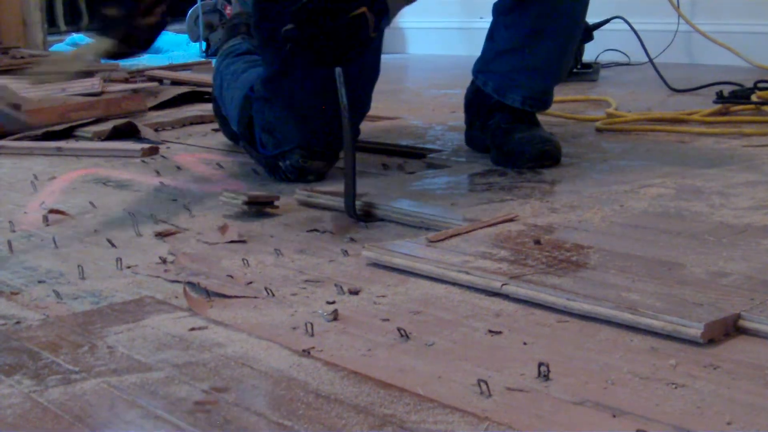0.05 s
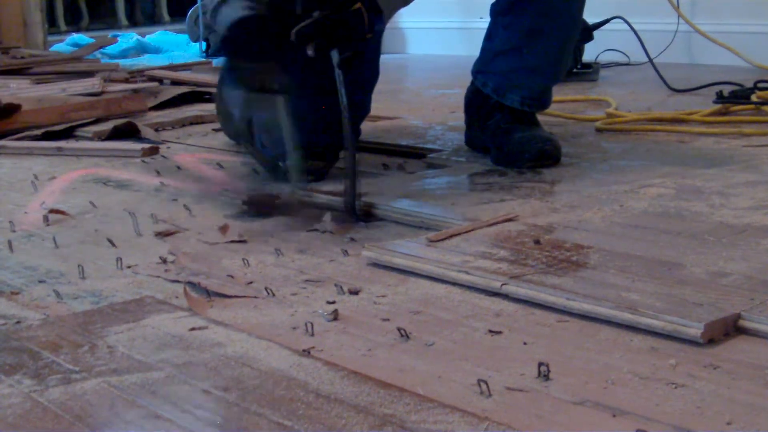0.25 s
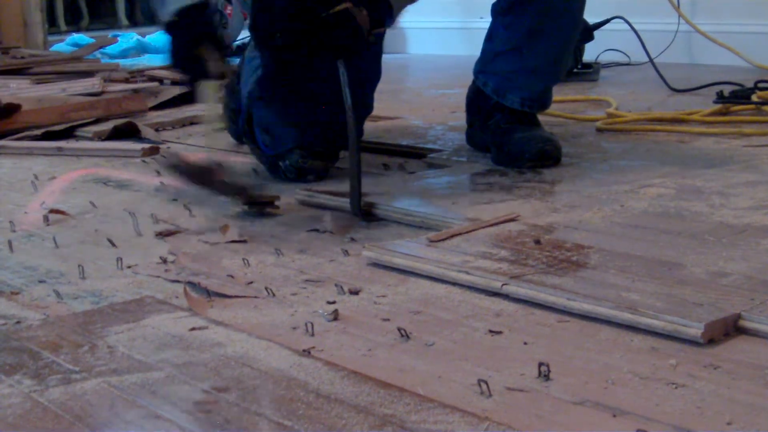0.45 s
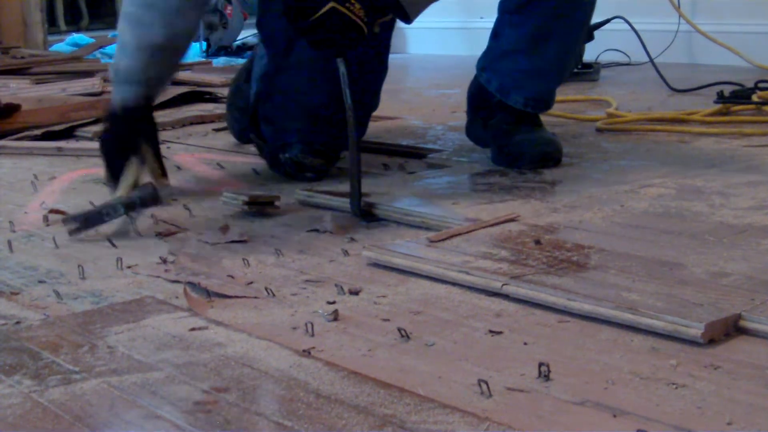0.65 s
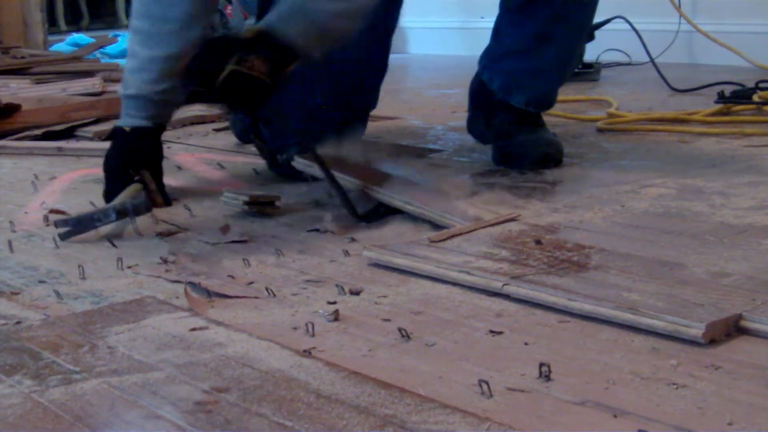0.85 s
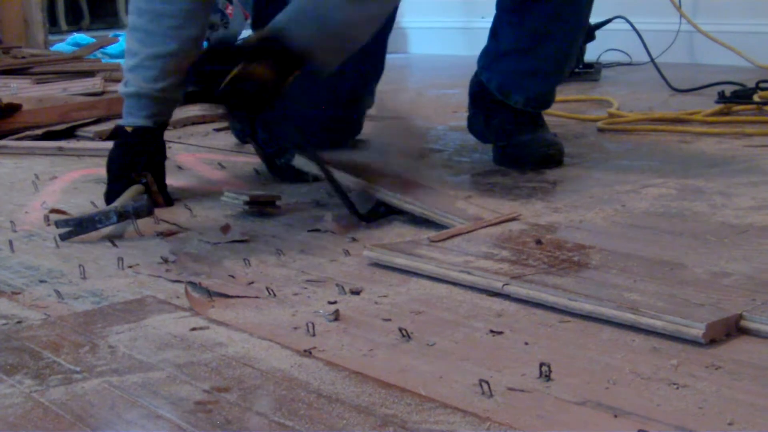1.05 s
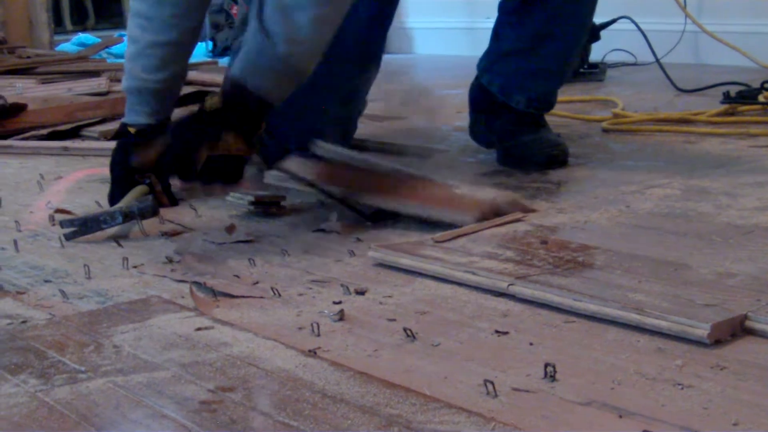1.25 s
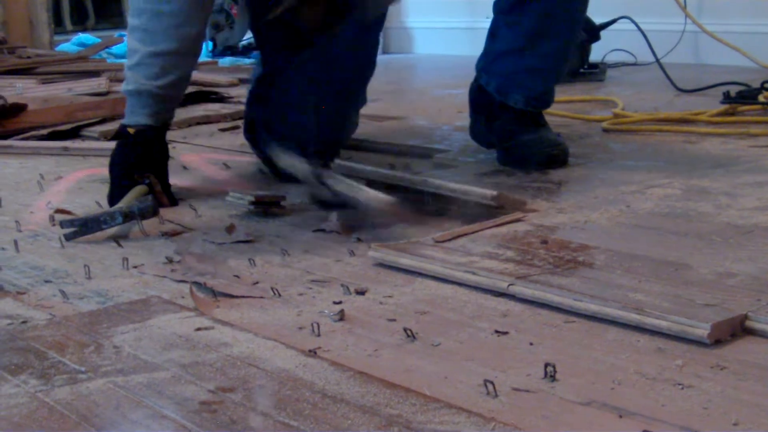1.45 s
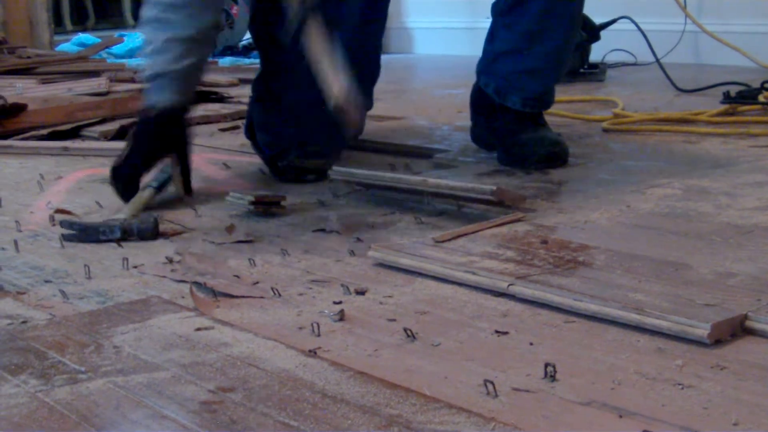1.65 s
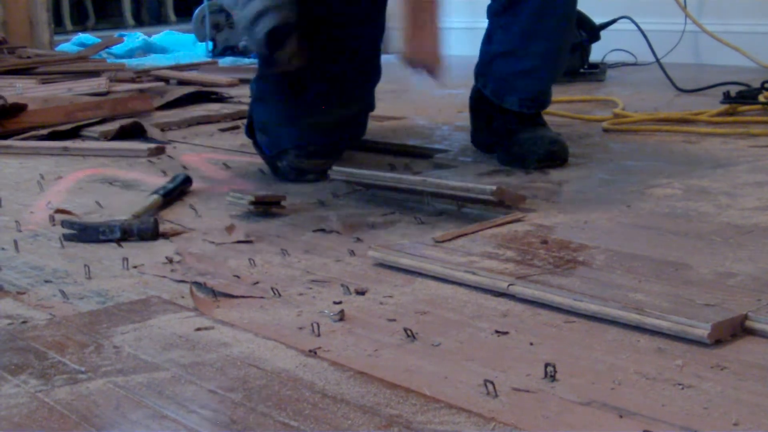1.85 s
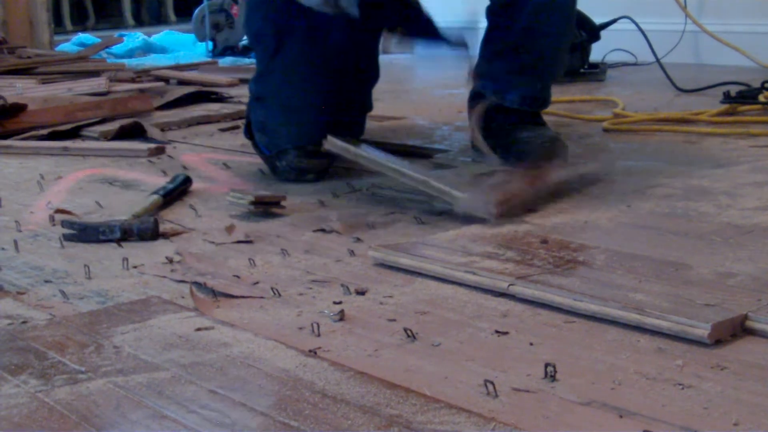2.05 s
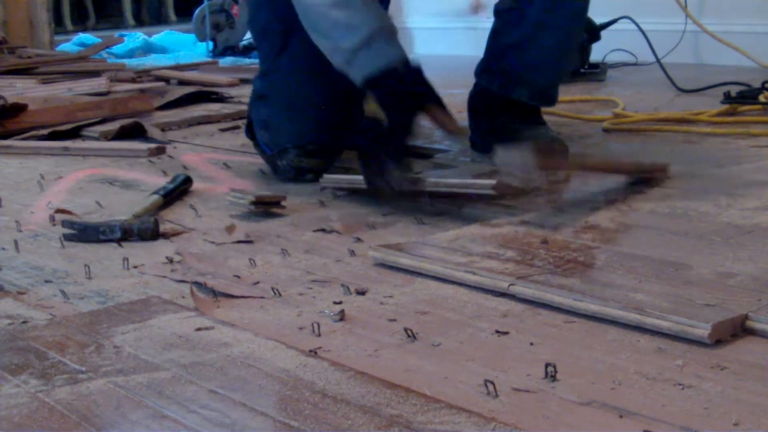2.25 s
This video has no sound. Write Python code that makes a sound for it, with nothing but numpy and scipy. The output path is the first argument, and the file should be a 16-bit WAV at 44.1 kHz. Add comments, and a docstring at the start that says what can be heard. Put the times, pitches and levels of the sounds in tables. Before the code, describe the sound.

In an empty, reverberant room, an earlier blow's echo fades, a hammer hits a pry bar hard, is set down with small knocks, a hardwood strip snaps free, soft thuds follow, and a broken piece lands.

```python
"""The echo of a hammer blow dies away in a bare room, then the hammer drives a steel bar under a floor strip.
The hammer is dragged and laid down, the strip cracks loose from its nails and a knee and boot shift.
A chip lands, then a broken piece of wood touches down on the subfloor and falls flat, over a faint hush.
Contacts are chattering clicks that may ring a few modes; drag, scuff and splinters are random clicks.
Each source is filtered to its colour and heard through wall echoes and a tail of decaying noise."""
import sys
import numpy as np
from scipy import signal
from scipy.fft import rfft, irfft, next_fast_len
from scipy.io import wavfile

SR = 44100
rng = np.random.default_rng(int(sys.argv[2]) if len(sys.argv) > 2 else 0)


def to_wav(s):
    """Save 16-bit WAV."""
    ch = np.atleast_2d(s).T  # columns
    pcm = np.round(np.clip(ch, -1, 1) * 32767)  # PCM
    wavfile.write(sys.argv[1], SR, pcm.astype(np.int16))


def voltage_ratio(level):
    """Linear amplitude factor for a level in decibels (scalar or array-like)."""
    return 10 ** (np.asarray(level, float) / 20)


N = 101429
LEAD = SR // 2   # pre-roll samples, for the blow before the start
SIZE = next_fast_len(N + 2 * SR)   # transform length, with space for the tails
MIC_TOP_HZ = 15300

# Hammer contacts on the steel bar: start_s, level_db, cutoff_hz, snap_above_cutoff_db
BLOWS = [(-0.16, -3, 5165, -15), (0.2085, -39, 4963, 11), (0.2106, 3.5, 5000, 1.5)]
# Ringing modes of the steel bar: pitch_hz, level_db, t60_s
BAR_MODES = [(1303, -58.5, .02), (1520, -44, .02), (2245, -46.5, 0.012), (2500, -46.5, 0.055),
             (6057, -39.5, .02), (7800, -42, 0.077), (10100, -41, 0.013), (11450, -42.5, .03)]
# Relative spectrum of the blows: frequency_hz, level_db
BLOW_COLOUR = [(35, -80), (60, -49.5), (135, -42), (209, -20), (302, -11.5), (381, -22), (458, -10),
               (539, -17), (663, -6.5), (798, -18.5), (982, -7), (1270, -1), (1880, -6), (2530, -3),
               (2910, -7), (3930, -10.5), (4310, -13.5), (6090, -7.5), (7160, -13.5), (9670, -8),
               (15000, -17)]


def hammer_on_bar():
    """Hard contacts set the short, bright modes of the steel ringing."""
    return in_room(struck(BLOWS, BAR_MODES), BLOW_COLOUR, direct_db=1.5, echo_db=-3.2)


# Pressure of the hammer's scrape on the floor: time_s, level_db
DRAG_PRESSURE = [(0.67, -70), (0.69, -54.5), (0.735, -51), (0.742, -39.5), (0.78, -41.5), (0.798, -39.5),
                 (0.818, -49.5), (0.86, -66.5)]
# Hammer knocks on the boards: start_s, level_db, cutoff_hz, snap_above_cutoff_db
KNOCKS = [(0.7105, -42, 2476, -3), (0.7175, -44, 2500, -14), (0.740, -33.5, 3000, -16),
          (0.753, -40, 5000, -1), (0.770, -41, 4000, -14), (0.778, -29.5, 2960, -13),
          (0.784, -31, 1800, -1), (0.795, -38, 1500, -19), (0.803, -48, 2980, 5)]
# Relative spectrum of drag and knocks: frequency_hz, level_db
DRAG_COLOUR = [(29, -48), (50, -2), (170, -13.5), (296, -8), (367, -14), (404, -12.5), (654, -7.5),
               (720, -3), (873, -4.5), (1160, -1), (1630, -6), (2070, -4), (3600, -13), (10900, -20),
               (15600, -24.5)]


def hammer_laid_down():
    """Friction makes a dense grit of clicks while the hammer knocks on the boards."""
    drag = rubbing(DRAG_PRESSURE, per_s=2100, spread_db=-1)
    return in_room(drag + struck(KNOCKS), DRAG_COLOUR, direct_db=4.5, echo_db=-3.5)


# Cracks as the strip comes loose: start_s, level_db, cutoff_hz, snap_above_cutoff_db
CRACKS = [(1.050, -49, 3073, -2), (1.0557, -23, 3250, 0), (1.0635, -17, 3000, -8),
          (1.0668, -11.5, 3130, -2.5), (1.079, -25, 4640, 15)]
# Ringing modes of the strip: pitch_hz, level_db, t60_s
STRIP_MODES = [(1396, -38, 0.045), (1840, -32.5, 0.0092), (2666, -36.5, 0.017)]
# Relative spectrum of cracks and splinters: frequency_hz, level_db
CRACK_COLOUR = [(29, -71), (50, -21), (124, -21.5), (177, -16.5), (230, -16), (531, -17), (674, -7),
                (856, -9), (1310, -2), (2020, -5.5), (2570, -6), (3500, -14), (3760, -16), (5640, -15.5),
                (7870, -21.5), (11300, -19.5), (15000, -31.5)]


def strip_cracks():
    """Sudden cracks ring the strip and start a dying shower of splinter clicks."""
    start_s, t60_s, start_db = 1.068, 0.36, -29
    t = np.arange(-LEAD, N) / SR - start_s
    level_db = np.where(t > 0, start_db - 60 * t / t60_s, -200)
    clicks = grains(level_db, per_s=1500, spread_db=1.4)
    splinters = np.diff(clicks, prepend=0)   # differencing tilts them to the treble
    return in_room(struck(CRACKS, STRIP_MODES) + splinters, CRACK_COLOUR, direct_db=4.5, echo_db=-22)


# Contacts of the small chip: start_s, level_db, cutoff_hz, snap_above_cutoff_db
CHIP_CONTACTS = [(1.940, -51, 4070, -11), (1.9425, -40, 2770, -18), (1.945, -38.5, 4000, 5.5),
                 (1.949, -39, 3000, -14.5), (1.976, -42.5, 2800, -26)]
# Ringing mode of the chip: pitch_hz, level_db, t60_s
CHIP_MODES = [(5800, -18.5, 0.0067)]
# Relative spectrum of the chip: frequency_hz, level_db
CHIP_COLOUR = [(47, -63), (80, -47), (219, -4), (404, -13), (482, -6), (715, -7), (1060, -15), (1540, -2),
               (2000, -17), (2600, -5), (2900, -25.5), (5480, -23), (15000, -30)]


def chip_lands():
    """A light chip makes small contacts with one very short, high ring."""
    return in_room(struck(CHIP_CONTACTS, CHIP_MODES), CHIP_COLOUR, direct_db=6, echo_db=-17)


# The wood touches down: start_s, level_db, cutoff_hz, snap_above_cutoff_db
DROPS = [(2.0125, -17.5, 5070, 4), (2.024, -38, 6100, 17)]
# Ringing modes of the piece of wood: pitch_hz, level_db, t60_s
PIECE_MODES = [(1420, -40.5, 0.046), (2142, -41, .045), (2194, -39, 0.035), (2560, -38, 0.023),
               (3220, -43, 0.025), (4400, -39.5, 0.021)]
# Relative spectrum of the touchdown: frequency_hz, level_db
DROP_COLOUR = [(29, -49), (50, -20), (98, -36), (177, -17.5), (272, -15), (354, -22), (389, -20),
               (941, -13.5), (1380, -9.5), (1710, -12.5), (2170, -6), (3180, -16), (3420, -23.5),
               (4340, -26), (7870, -44.5), (11000, -39), (15000, -49)]


def piece_touches_down():
    """The impact sets the modes of the wood ringing briefly."""
    return in_room(struck(DROPS, PIECE_MODES), DROP_COLOUR, direct_db=0, echo_db=-5)


# The wood falls flat: start_s, level_db, cutoff_hz, snap_above_cutoff_db
FLOPS = [(2.258, -28, 704, -22), (2.261, -26.5, 2530, -8), (2.274, -29.5, 2800, -2), (2.29, -52, 5000, 12)]
# Relative spectrum of the fall: frequency_hz, level_db
FLOP_COLOUR = [(47, -56), (80, -38), (244, -8.5), (404, -14), (731, -7.5), (1570, -4.5), (2040, -12.5),
               (2280, 0), (3380, -35.5), (11300, -40.5), (15000, -48)]


def piece_falls_flat():
    """Flat contacts slap the subfloor without a ring of their own."""
    return in_room(struck(FLOPS), FLOP_COLOUR, direct_db=2.5, echo_db=-5)


# Bumps under the blow and as knee and boot shift: start_s, level_db, cutoff_hz, snap_above_cutoff_db
THUDS = [(0.211, -30, 70, -50.5), (0.58, -41, 292, -40), (0.705, -34.5, 209, -36.5), (0.80, -31, 86.3, -44),
         (1.541, -37.5, 396, -43), (1.573, -39.5, 400, -42), (1.590, -43.5, 2170, -27),
         (1.606, -41, 1207, -28), (1.613, -49, 1100, -27), (1.645, -48, 1210, -21.5),
         (1.685, -52, 3000, -23), (1.74, -49, 397, -31), (1.812, -60, 4500, -18.5)]
# Pressure of a boot scuffing the dust: time_s, level_db
SCUFF_PRESSURE = [(1.575, -79), (1.595, -67.5), (1.63, -75), (1.67, -82)]
# Relative spectrum of bumps and scuff: frequency_hz, level_db
THUD_COLOUR = [(24, -32.5), (45, -20), (167, -23), (252, -3.5), (418, -15.5), (865, -11.5), (1300, -15),
               (2000, -25), (2600, -24.5), (3400, -29), (5000, -42.5), (10500, -27), (13000, -38),
               (15500, -55)]


def subfloor_thuds():
    """Dull bumps come through the subfloor; a boot on dust adds fine friction grit."""
    scuff = rubbing(SCUFF_PRESSURE, per_s=6000, spread_db=-6)
    return in_room(struck(THUDS) + scuff, THUD_COLOUR, direct_db=4, echo_db=-5.5)


# Relative spectrum of still air and microphone: frequency_hz, level_db
HUSH_COLOUR = [(18, -51.5), (30, -16), (180, -14.5), (597, -21), (1600, -37.5), (1870, -17), (2370, -34),
               (15000, -37.5)]


def hush():
    """Still air and microphone give steady, faint coloured noise in mid and side."""
    level_db, side_db = -80, -7   # mid RMS; side relative to mid
    white = rfft(rng.standard_normal((2, SIZE)))
    colour = voltage_ratio(at_hz(HUSH_COLOUR, np.fft.rfftfreq(SIZE, 1 / SR)))
    noise = irfft(white * colour, SIZE)[:, :N]
    return noise / noise[0].std() * voltage_ratio(level_db) * voltage_ratio([[0], [side_db]])


def struck(contacts, modes=()):
    """Each contact is a chattering click plus modal ring, weighted below and above its cut-off."""
    out = np.zeros(LEAD + N + SR)
    # each contact stirs each mode differently
    spread_db = rng.normal(0, 1, (len(contacts), len(modes)))
    lags_s = rng.uniform(0.0002, 0.0012, size=(len(contacts), 3))
    for (start_s, level_db, cutoff_hz, snap_db), offsets_db, lags in zip(contacts, spread_db, lags_s):
        hit = chatter(lags)
        body = hit.copy()
        for (pitch_hz, mode_db, t60_s), offset_db in zip(modes, offsets_db):
            body += voltage_ratio(mode_db + offset_db) * ring(hit, pitch_hz, t60_s)
        dull = signal.lfilter(*signal.butter(2, cutoff_hz, "low", fs=SR), body)
        snap = signal.lfilter(*signal.butter(2, cutoff_hz, "high", fs=SR), body)
        i = LEAD + int(start_s * SR)
        # subtracting keeps the two bands from cancelling at the cut-off
        out[i:i + len(body)] += voltage_ratio(level_db) * (dull - voltage_ratio(snap_db) * snap)
    return out[:LEAD + N]


def chatter(lags_s):
    """Quick rebounds spread a click through all-pass delays, leaving its spectrum flat."""
    rebound = 0.6
    hit = np.zeros(SR // 4)
    hit[0] = 1
    for lag in (lags_s * SR).astype(int):
        feedback = np.zeros(lag + 1)
        feedback[0], feedback[-1] = 1, rebound
        hit = signal.lfilter(feedback[::-1], feedback, hit + 1e-18)
    return hit


def ring(clicks, pitch_hz, t60_s):
    """A damped resonator turns each unit click into a decaying sine starting from height 1."""
    decay = voltage_ratio(-60 / (t60_s * SR))
    turn = 2 * np.pi * pitch_hz / SR
    return signal.lfilter([0, np.sin(turn)], [1, -2 * decay * np.cos(turn), decay * decay], clicks + 1e-18)


def rubbing(pressure, per_s, spread_db):
    """Friction is random grit following a pressure curve, tilted to the treble."""
    time_s, db = np.transpose(pressure)
    level_db = np.interp(np.arange(-LEAD, N) / SR, time_s, db, left=-200, right=-200)
    return signal.lfilter([1, -0.7], [1], grains(level_db, per_s, spread_db))


def grains(level_db, per_s, spread_db):
    """Tiny contacts are random clicks of either sign, with random sizes around a level curve."""
    size = voltage_ratio(spread_db * np.minimum(rng.exponential(1, LEAD + N), 4))
    sign = rng.choice([-1, 1], LEAD + N)
    present = rng.random(LEAD + N) < per_s / SR
    return size * sign * present * voltage_ratio(level_db)


def in_room(source, colour, direct_db, echo_db):
    """Filters a source to its colour and through the room, giving mid and side."""
    coloured = rfft(source, SIZE) * rfft(causal(colour), SIZE)
    return irfft(coloured * room(direct_db, echo_db), SIZE)[:, LEAD:LEAD + N]


# Decay from the walls alone: frequency_hz, t60_s
WALL_T60 = [(60, 0.25), (150, 0.7), (300, .9), (700, 0.78), (1400, 0.71), (2700, 0.62), (5000, 0.76),
            (9000, 0.69)]
# Wall echoes: delay_s, level_db
ECHOES = [(0.0163, -25), (.0195, -20.5), (0.0255, -33.5), (0.038, -25)]
# Side relative to mid in the reverberation: frequency_hz, level_db
ROOM_SIDE = [(50, -20.5), (250, -27.5), (500, -39.5), (1000, -31.5), (2000, -37.5), (4000, -50.5),
             (16000, -51)]


def room(direct_db, echo_db):
    """Direct sound, smeared wall echoes and a noise tail that walls and air damp band by band."""
    tail_db, gap_s, build_s, echo_t60_s = -26, 0.001, 0.005, 0.017
    air_db_per_s = 65.5   # at 10 kHz, growing with frequency squared
    length = SR * 3 // 2
    t, hz = np.arange(length) / SR, np.fft.rfftfreq(length, 1 / SR)
    white = rfft(rng.standard_normal((2, length)))
    white[1] *= voltage_ratio(at_hz(ROOM_SIDE, hz))
    noise = 0
    for k in range(15):
        centre_hz = 40 * 2 ** (k / 1.6)
        # overlapping triangular bands on a log-frequency axis
        share = np.clip(1 - np.abs(np.log2((hz + 1) / 40) * 1.6 - k), 0, 1)
        wall_loss = 60 / at_hz(WALL_T60, centre_hz)
        air_loss = air_db_per_s * (min(centre_hz, MIC_TOP_HZ) / 1e4) ** 2
        noise = noise + irfft(white * share, length) * voltage_ratio(-t * (wall_loss + air_loss))
    echoes = 0
    for delay_s, level_db in ECHOES:
        age = t - delay_s
        echoes = echoes + voltage_ratio(level_db - 60 * np.maximum(age, 0) / echo_t60_s) * (age >= 0)
    build = 1 - np.exp(-np.maximum(t - gap_s, 0) / build_s)
    response = noise * (voltage_ratio(tail_db) * build + voltage_ratio(echo_db) * echoes)
    response[0, 0] += voltage_ratio(direct_db)   # direct sound in mid only
    return rfft(response, SIZE)


def causal(colour):
    """Minimum-phase pulse with this relative spectrum, scaled to peak height 1."""
    level_db = np.maximum(at_hz(colour, np.fft.rfftfreq(8192, 1 / SR)), -70)
    cepstrum = irfft(level_db * np.log(10) / 20)
    # folding the cepstrum forward gives minimum phase
    cepstrum[1:4096] *= 2
    cepstrum[4097:] = 0
    pulse = irfft(np.exp(rfft(cepstrum)))
    return pulse / np.abs(pulse).max()


def at_hz(points, hz):
    """Reads a table on a log-frequency axis."""
    table_hz, values = np.transpose(points)
    return np.interp(np.log(hz + 1), np.log(table_hz), values)


def scene():
    """Sums all sources and turns mid and side into left and right."""
    hammer = hammer_on_bar() + hammer_laid_down()
    tumble = chip_lands() + piece_touches_down() + piece_falls_flat()
    mid, side = hammer + strip_cracks() + tumble + subfloor_thuds() + hush()
    return np.array([mid + side, mid - side])


def roll_off(x):
    """The treble ends steeply here."""
    return signal.sosfilt(signal.butter(12, 16370, fs=SR, output="sos"), x)


def record(dry):
    """The microphone has a narrow dip in the treble and a steep top edge."""
    notch_hz, width_hz, removed_share = 7960, 500, 0.6
    notch_band = signal.lfilter(*signal.iirpeak(notch_hz, notch_hz / width_hz, fs=SR), dry)
    dipped = dry - removed_share * notch_band
    top_edge = signal.cheby2(10, 40, MIC_TOP_HZ * 1.04, fs=SR, output="sos")
    mix = signal.sosfilt(top_edge, dipped)
    return roll_off(mix)


dry = scene()
out = record(dry)
to_wav(out)
```